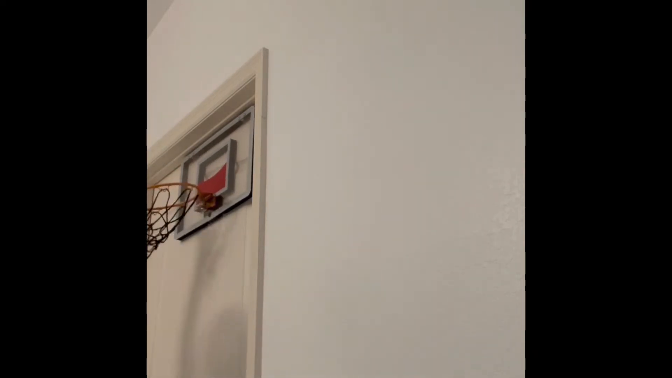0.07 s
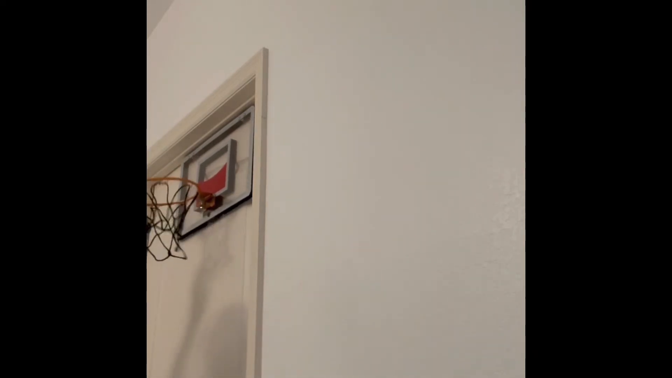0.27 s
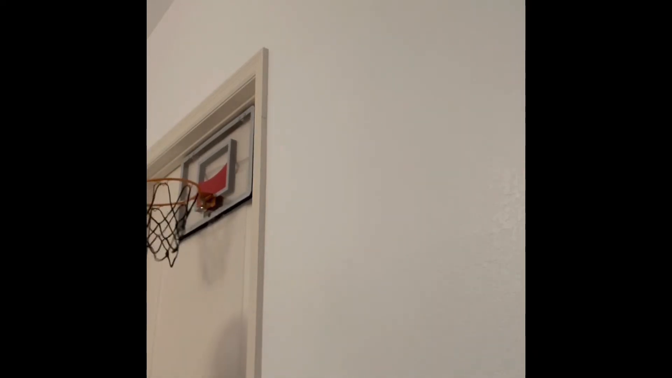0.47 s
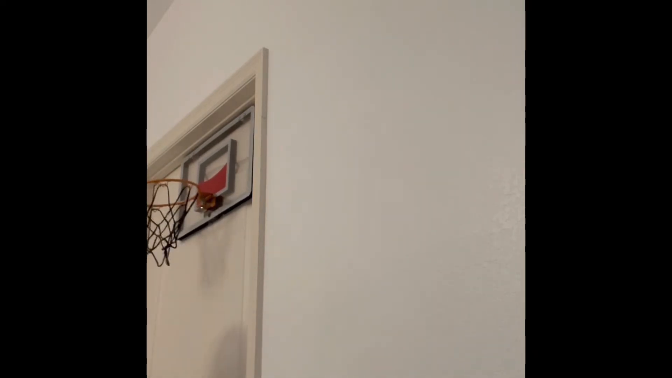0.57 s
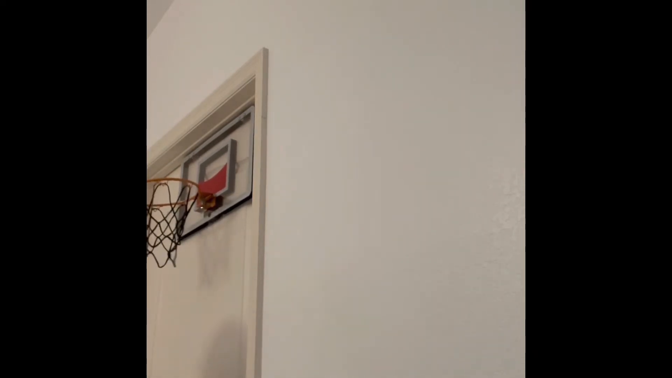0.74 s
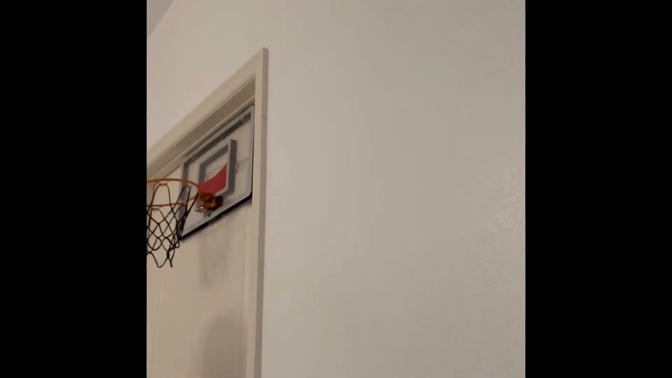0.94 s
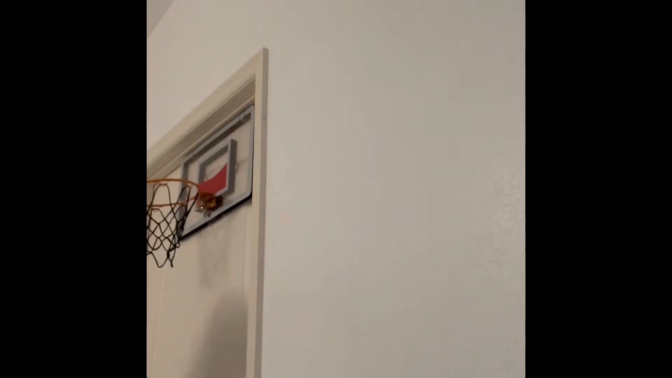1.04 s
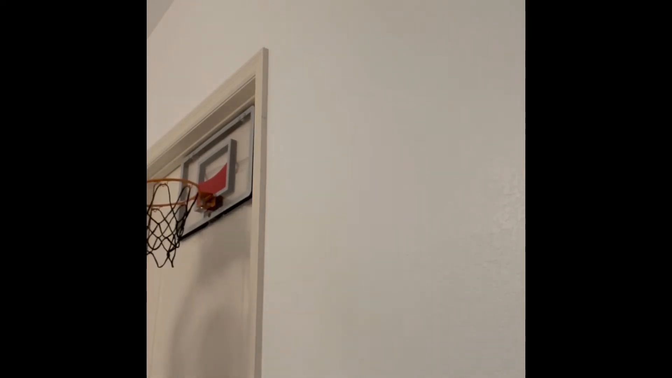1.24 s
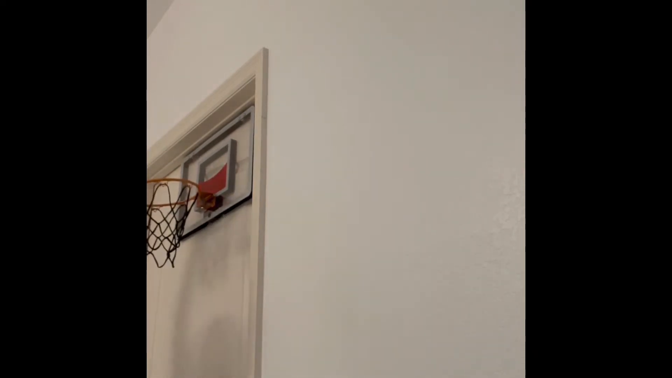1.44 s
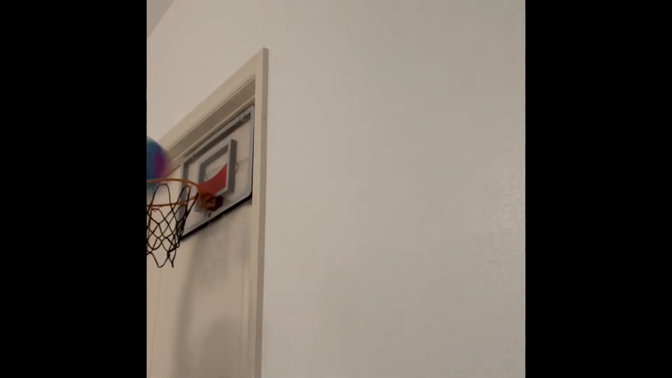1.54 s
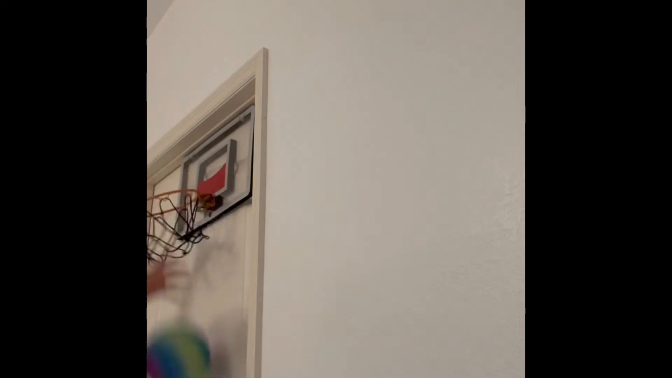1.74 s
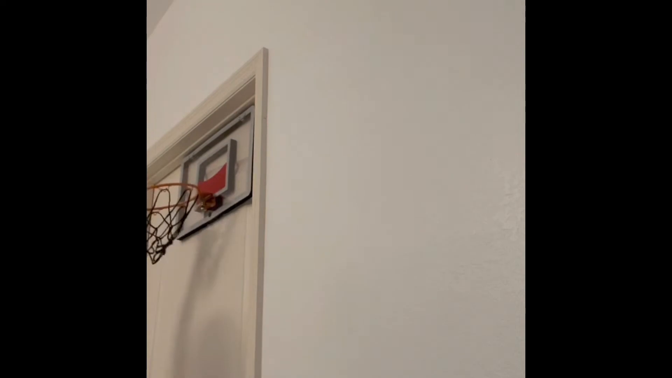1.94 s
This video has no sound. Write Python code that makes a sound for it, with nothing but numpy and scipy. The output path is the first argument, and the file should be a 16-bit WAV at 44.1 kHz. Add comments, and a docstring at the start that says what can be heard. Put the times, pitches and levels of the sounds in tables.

```python
"""A bare room: two dunks on a mini basketball hoop hung over a door.
The backboard clacks against the door, the door booms, the steel rim rings and the ball thuds.
The net swishes; a faint squeak, rumble and hum lie underneath.
The loudest knock overloads the microphone."""
import sys
import numpy as np
from scipy import signal
from scipy.fft import rfft, irfft
from scipy.io import wavfile
from scipy.ndimage import map_coordinates

SR = 44100
rng = np.random.default_rng(int(sys.argv[2]) if len(sys.argv) > 2 else 0)


def waveform_to_disk(signal):
    """Save audio, clipped to [-1, 1], as 16-bit WAV at the path in sys.argv[1]."""
    frames = np.transpose(np.atleast_2d(signal))
    scaled = np.clip(frames, -1, 1) * 32767
    samples = np.round(scaled).astype(np.int16)
    wavfile.write(sys.argv[1], SR, samples)


N = 88200
LEAD_S, RING_S = 0.2, 1.4
AGE_S = np.arange(int(RING_S * SR)) / SR


def knocks():
    """The backboard slaps the door and shakes the steel rim."""
    # (time [s], clack [dB], contact cut-off [Hz], door [dB], board [dB], rim [dB])
    hits = [(-.05, -31.5, 2900, -46, -31.5, -49), (.2000, -10, 10800, -16, -18.5, -25.5),
            (.2070, -10, 14800, -32.5, -14.5, -19.5), (.228, -20.5, 4000, -30.5, -22, -32.5),
            (.491, -32.5, 11900, -26, -27, -33.5), (1.239, -67.5, 6000, -48, -70, -68.5),
            (1.581, -24.5, 3040, -54.5, -34.5, -44), (1.595, -15, 3360, -32, -20, -38),
            (1.611, -15.5, 2180, -35, -31, -44)]
    # clack spectrum (frequency [Hz], density [dB])
    clack_colour = [(40, -17.5), (150, 0.5), (280, 3), (420, 9), (750, 0), (1400, -4), (2200, -4.5),
                    (3250, -1.5), (4100, -5.5), (5350, -3), (6100, -7), (7300, -8.5), (9000, -12),
                    (11000, -17), (15000, -7.5)]
    # backboard modes (frequency [Hz], level [dB], t60 [s])
    board_modes = [(342, -9, 0.66), (373.8, -3, 0.75), (419.9, 1.5, 0.37), (433, -6, 0.85),
                   (463.2, -6.5, 0.69), (489.5, -1, 0.42), (622, -11.5, .6), (672.5, -9.5, .5),
                   (805, -15, 0.5)]
    # rim modes (frequency [Hz], level [dB], t60 [s])
    rim_modes = [(574, -4, 0.81), (1232, -2, 0.42), (1335, -1.5, 0.61), (1376, -5, 0.76), (1460, 0, 0.49),
                 (2162, -11, 0.69), (2257, -8.5, 0.64), (2844, -14, 0.36), (3122, -12.5, 0.42),
                 (3100, -10.5, 0.28), (3725, -19.5, 1.05), (4600, -24.5, 1.0), (5447, -14, 0.27),
                 (7780, -22, 0.4)]
    out, body = blank(), dense_resonances()
    for start_s, clack_db, contact_hz, door_db, board_db, rim_db in hits:
        clack = soften(impact(clack_colour, t60_s=0.029, direct_db=8.5), contact_hz)
        clack = undb(clack_db) * signal.fftconvolve(clack, body)[:len(AGE_S)]
        board = undb(board_db) * ring(board_modes, rise_s=0.0024, waver_rad=1.0, waver_hz=24)
        rim = undb(rim_db) * ring(rim_modes, rise_s=0.0024, waver_rad=1.0, waver_hz=30)
        add(out, start_s, clack + undb(door_db) * door() + board + rim)
    return out[-N:]


def door():
    """The door panel booms on its hinges; its two lowest modes beat."""
    # panel modes (frequency [Hz], level [dB], t60 [s])
    panel_modes = [(60.6, -2.5, .6), (72, 2, 0.42), (85.9, 0, 0.38), (117.3, -2.5, .55), (142.1, -15.5, .6),
                   (183.7, -9.5, 0.76), (255.5, -11.5, 0.81)]
    return ring(panel_modes, rise_s=0.003, waver_rad=0.25, waver_hz=14)


def thuds():
    """Soft blows of the ball, and the door bumping in its frame."""
    # (time [s], thud [dB], contact resonance [Hz], door [dB], ball [dB])
    blows = [(-.06, -25.5, 777, -21.5, -36), (.005, -28.5, 161, -35, -43), (.365, -30.5, 405, -44, -55),
             (.51, -24, 300, -27.5, -47), (.77, -50, 99, -46.5, -73), (1.125, -52, 290, -61.5, -70.5),
             (1.189, -56.5, 526, -48, -60.5), (1.583, -23.5, 426, -40, -38), (1.608, -21.5, 875, -16, -22),
             (1.624, -22, 615, -44, -29), (1.69, -28, 435, -30, -34), (1.776, -34.5, 480, -36, -41)]
    # thud spectrum (frequency [Hz], density [dB])
    thud_colour = [(40, -6), (120, -11.5), (260, 1), (450, -2), (800, -5.5), (1400, -6.5), (3000, -10),
                   (8000, -23), (16000, -25)]
    # modes of the ball and its air (frequency [Hz], level [dB], t60 [s])
    ball_modes = [(192.2, 0.5, 0.28), (238.6, -1, 0.57), (401, -2, 0.73), (535, 1, 0.43), (715, 2, 0.43),
                  (820, -2, 0.72), (923, -1.5, 0.38), (1129, -9, 0.65), (1427, -6.5, 0.32)]
    out = blank()
    for start_s, thud_db, contact_hz, door_db, ball_db in blows:
        thud = cushion(impact(thud_colour, t60_s=0.15, direct_db=9), contact_hz) * rise(0.002)
        ball = ring(ball_modes, rise_s=0.003, waver_rad=0.97, waver_hz=22)
        add(out, start_s, undb(thud_db) * thud + undb(door_db) * door() + undb(ball_db) * ball)
    return out[-N:]


def swishes():
    """Net cords rub and whip in uneven bursts."""
    # (time [s], rise [s], t60 [s], level [dB])
    bursts = [(-.08, 0.036, 1.9, -61.5), (.481, 0.011, 0.35, -38), (0.599, 0.13, 1.1, -56.5),
              (0.901, 0.1, 1.14, -59), (1.06, 0.16, 0.4, -57.5), (1.509, 0.039, 0.69, -62),
              (1.8, 0.0082, 0.47, -39)]
    # cord noise spectrum (frequency [Hz], density [dB])
    net_colour = [(100, -23.5), (1000, -6), (2500, 3), (5000, 0.5), (8000, -2), (11000, -11.5), (15000, -5)]
    out = blank()
    for start_s, rise_s, t60_s, db in bursts:
        attack = np.minimum(AGE_S / rise_s, 1)
        decay = np.minimum(undb(-60 * (AGE_S - rise_s) / t60_s), 1)
        flutter_db = 1.5 * drift(151, len(AGE_S))
        add(out, start_s, undb(db + flutter_db) * attack * decay * noise(net_colour, len(AGE_S)))
    return out[-N:]


def squeak(length_s=0.75, pitch_hz=2929.5, peak_db=-53.5, waver_rad=2.2, waver_hz=420):
    """A faint, unsteady tone swells and fades around the first dunk."""
    out = blank()
    tone = np.sin(2 * np.pi * pitch_hz * AGE_S + waver_rad * drift(waver_hz, len(AGE_S)))
    swell = np.sin(np.pi * np.minimum(AGE_S / length_s, 1))
    add(out, -LEAD_S, undb(peak_db) * unit(tone) * swell)
    return out[-N:]


def reverberation(colour, build_s=0.007):
    """Diffuse room tail in octave bands; the top dies first."""
    # room decay (frequency [Hz], t60 [s])
    room_decay = [(60, 1), (250, 0.56), (500, 0.95), (1400, .82), (3000, 0.56), (6000, 0.57), (9000, 0.57),
                  (13000, 0.35)]
    spectrum = rfft(noise(colour, len(AGE_S)))
    hz = np.fft.rfftfreq(len(AGE_S), 1 / SR)
    centres_hz = 55 * 2. ** np.arange(9)
    octave = np.interp(np.log(hz + 1), np.log(centres_hz), np.arange(len(centres_hz)))
    tail = 0
    for k, centre_hz in enumerate(centres_hz):
        band = irfft(spectrum * np.maximum(1 - abs(octave - k), 0), len(AGE_S))
        tail += band * fade(lookup(room_decay, centre_hz))
    return rise(build_s) * tail


def room_tone(air_db=-49, hum_hz=566, hum_db=-60):
    """Low rumble and hiss with a faint wavering hum."""
    # background spectrum (frequency [Hz], density [dB])
    air_colour = [(20, -6), (45, -11.5), (68, 3.5), (110, -15), (170, -13), (500, -21.5), (1000, -21.5),
                  (2000, -31.5), (5000, -38), (10000, -47), (16000, -43.5)]
    hum = np.sin(2 * np.pi * hum_hz * np.arange(N) / SR + 0.5 * drift(24, N))
    return undb(air_db) * noise(air_colour, N) + undb(hum_db) * unit(hum)


def impact(colour, t60_s, direct_db, tail_db=-2):
    """A short noise burst, then the room."""
    direct = noise(colour, len(AGE_S)) * fade(t60_s)
    return undb(direct_db) * direct + undb(tail_db) * reverberation(colour)


def ring(modes, rise_s, waver_rad, waver_hz):
    """Decaying modes whose phase wanders in the room."""
    out = 0
    for hz, db, t60_s in modes:
        phase = 2 * np.pi * hz * AGE_S + waver_rad * drift(waver_hz, len(AGE_S))
        out += undb(db) * fade(t60_s) * np.sin(phase)
    return out * rise(rise_s)


def dense_resonances(ripple_db=1.3, spacing_hz=23.96, size=8192):
    """Narrow peaks and dips shared by all clacks, as a causal response."""
    hz = np.fft.rfftfreq(size, 1 / SR)
    db = ripple_db * np.interp(hz / spacing_hz, np.arange(size), rng.standard_normal(size))
    cepstrum = irfft(np.log(undb(db)), size)
    response = irfft(np.exp(rfft(2 * cepstrum[:size // 2], size)), size)  # minimum phase
    return response / np.linalg.norm(response)


def soften(x, hz):
    """A softer contact cuts the treble."""
    return signal.sosfilt(signal.butter(1, hz, fs=SR, output="sos"), x)


def cushion(x, hz, q=2.02):
    """Springy contact: a resonant low-pass."""
    w = 2 * np.pi * hz
    return signal.lfilter(*signal.bilinear([w * w], [1, w / q, w * w], SR), x)


def noise(colour, size):
    """Random-phase noise of a given spectrum, rms 1."""
    hz = np.fft.rfftfreq(size, 1 / SR)
    phases = np.exp(2j * np.pi * rng.random(len(hz)))
    return unit(irfft(undb(lookup(colour, hz)) * phases, size))


def drift(rate_hz, size):
    """Linearly joined random values, spread near 1."""
    points = rng.standard_normal(1024)
    return map_coordinates(points, [np.arange(size) * rate_hz / SR], order=1, mode="wrap")


def fade(t60_s):
    """Exponential decay."""
    return undb(-60 * AGE_S / t60_s)


def rise(tau_s):
    """Smooth onset."""
    return 1 - np.exp(-AGE_S / tau_s)


def lookup(table, hz):
    """Interpolate over log frequency."""
    knots_hz, values = np.array(table, float).T
    return np.interp(np.log(np.maximum(hz, 1)), np.log(knots_hz), values)


def undb(db):
    """Decibels to gain."""
    return 10 ** (np.asarray(db) / 20)


def unit(x):
    """Scale to rms 1."""
    return x / np.sqrt(np.mean(x ** 2))


def blank():
    """Silence with a lead-in for sounds begun before time 0."""
    return np.zeros(N + int(LEAD_S * SR))


def add(out, start_s, x):
    """Mix x in at start_s, from -LEAD_S on."""
    i = int((start_s + LEAD_S) * SR)
    out[i:i + len(x)] += x[:len(out) - i]


def scene():
    """Mono sum at the microphone."""
    return (knocks() + thuds() + swishes() + squeak() + room_tone())[None]


def record(dry):
    """The microphone drops the deepest bass, clips the loudest peaks and cuts the top."""
    low_hz, top_hz = 35.5, 15800
    highpass = signal.butter(2, low_hz, "high", fs=SR, output="sos")
    lowpass = signal.ellip(10, 0.1, 80, top_hz, fs=SR, output="sos")
    clipped = np.clip(signal.sosfilt(highpass, dry), -1, 1)
    return signal.sosfilt(lowpass, clipped)


dry = scene()
out = record(dry)
waveform_to_disk(out)
```